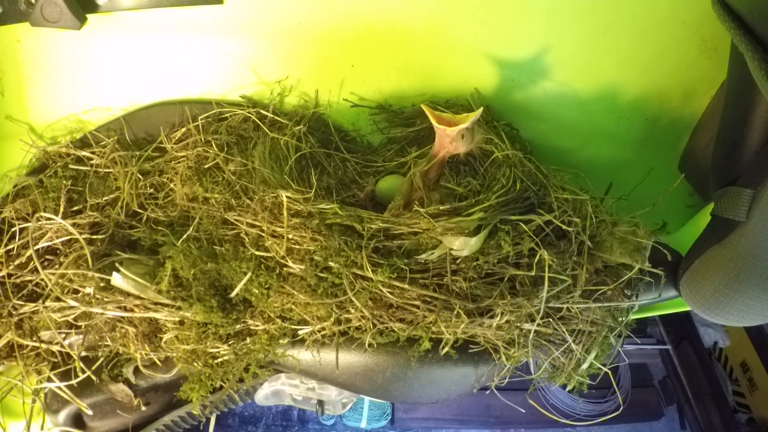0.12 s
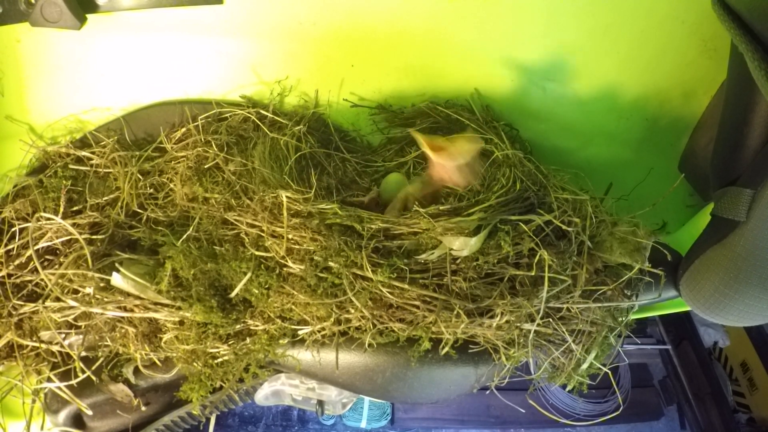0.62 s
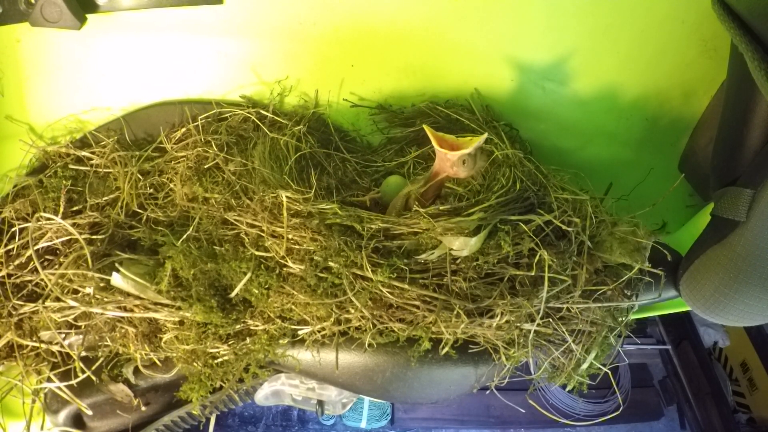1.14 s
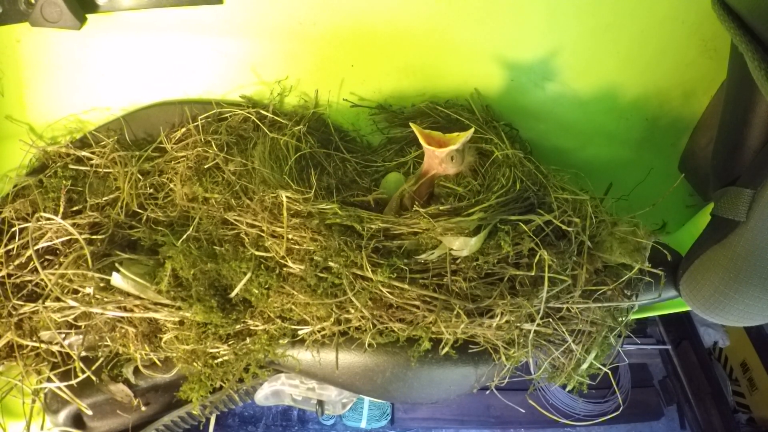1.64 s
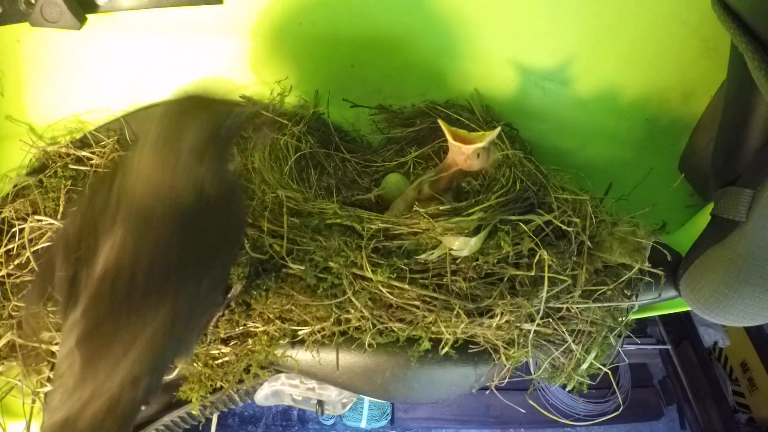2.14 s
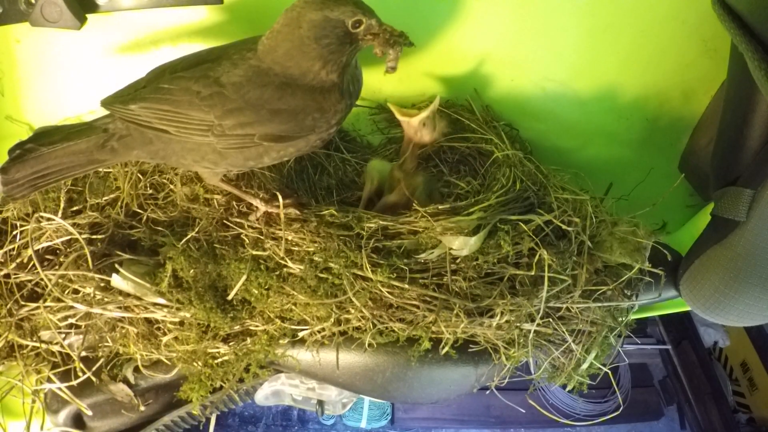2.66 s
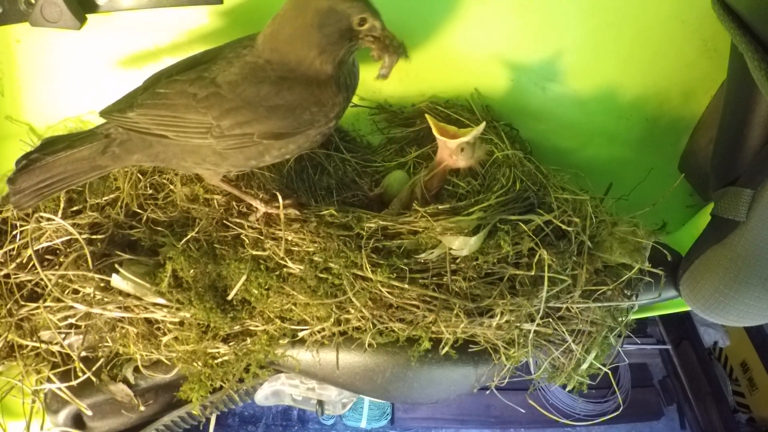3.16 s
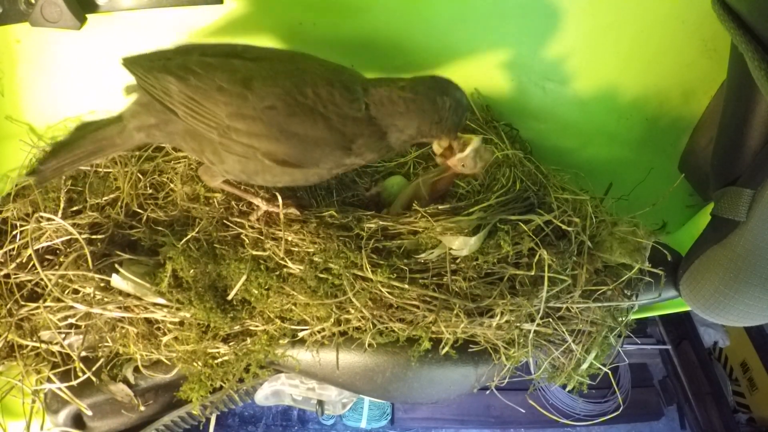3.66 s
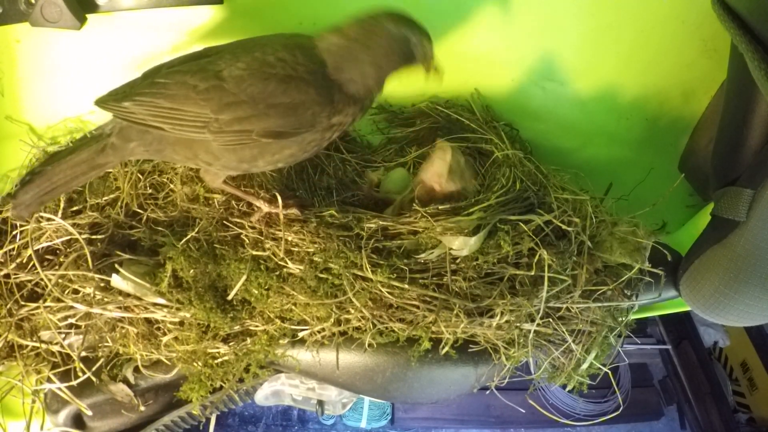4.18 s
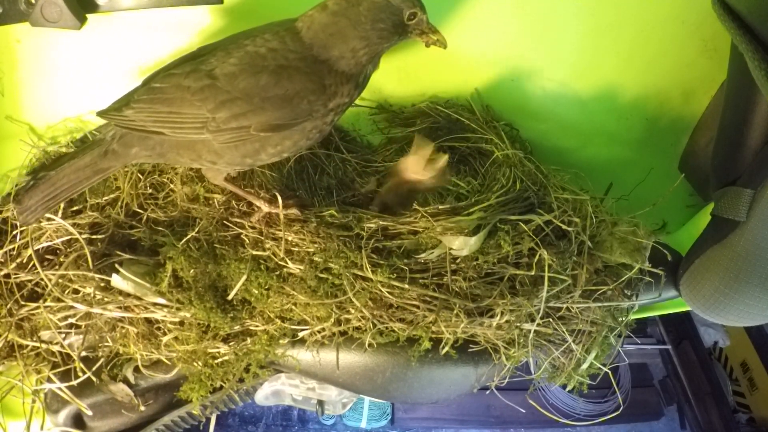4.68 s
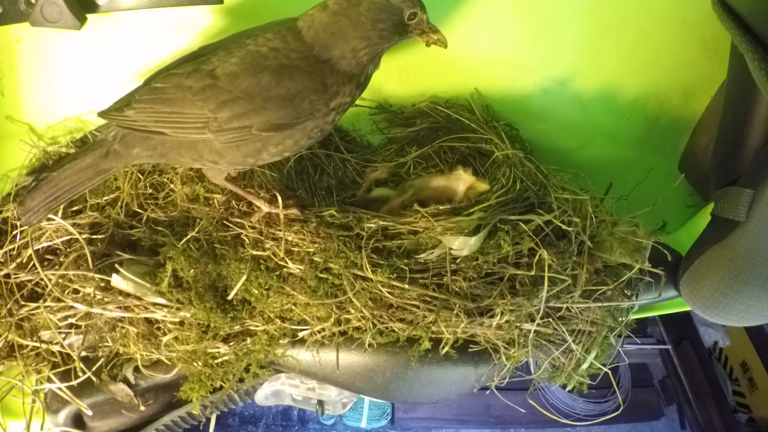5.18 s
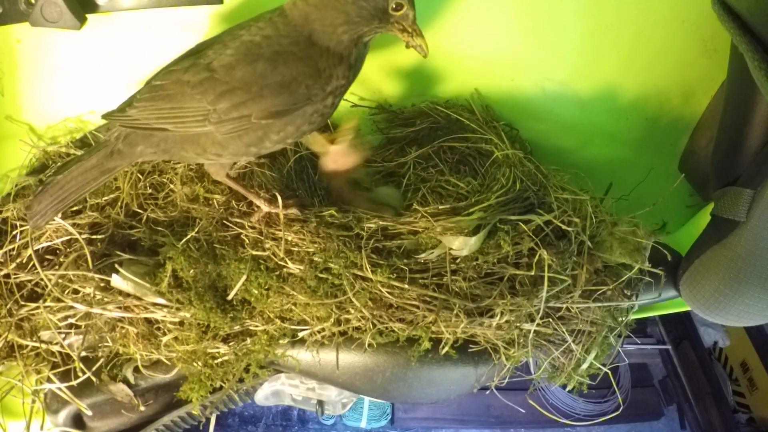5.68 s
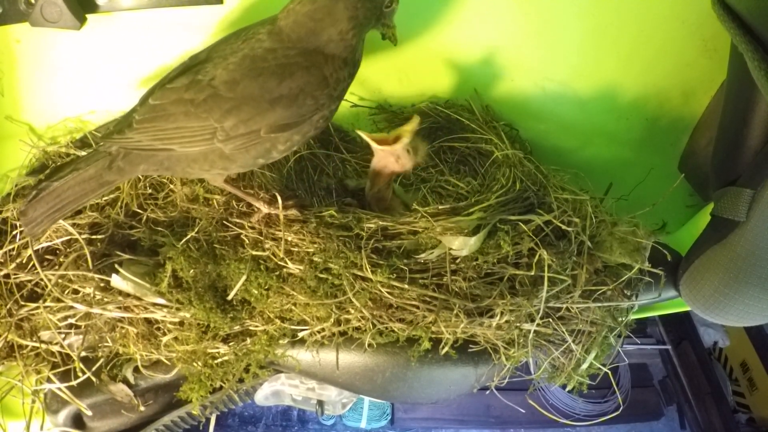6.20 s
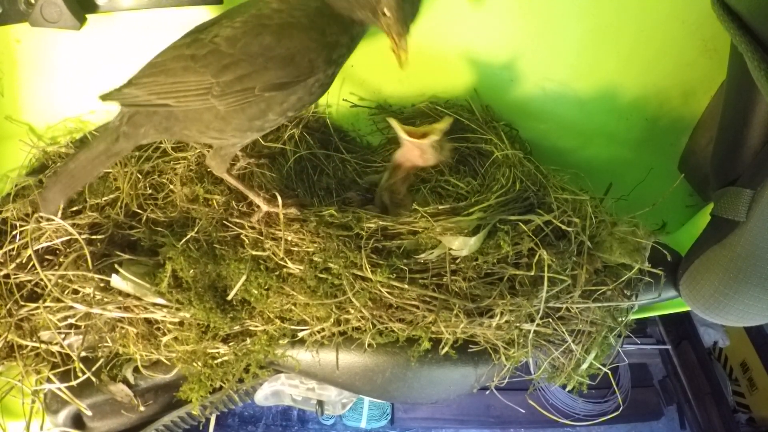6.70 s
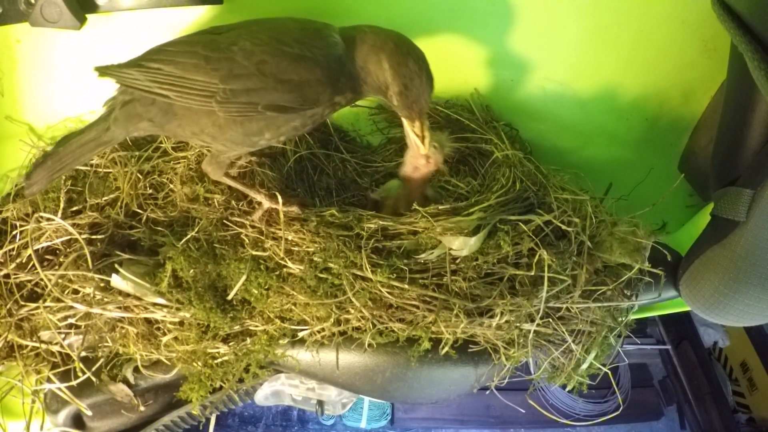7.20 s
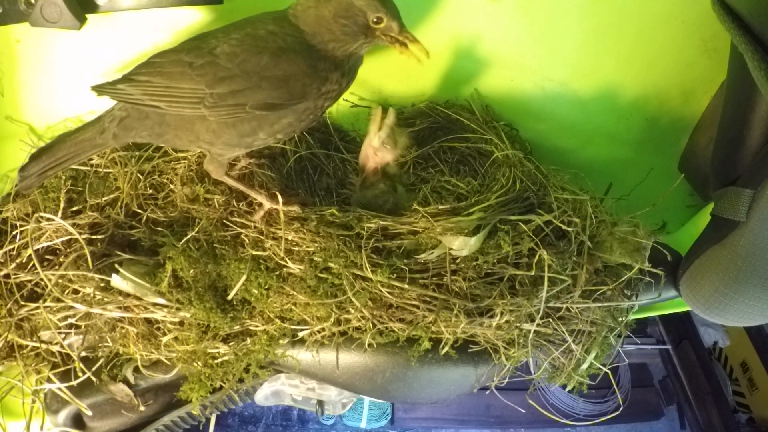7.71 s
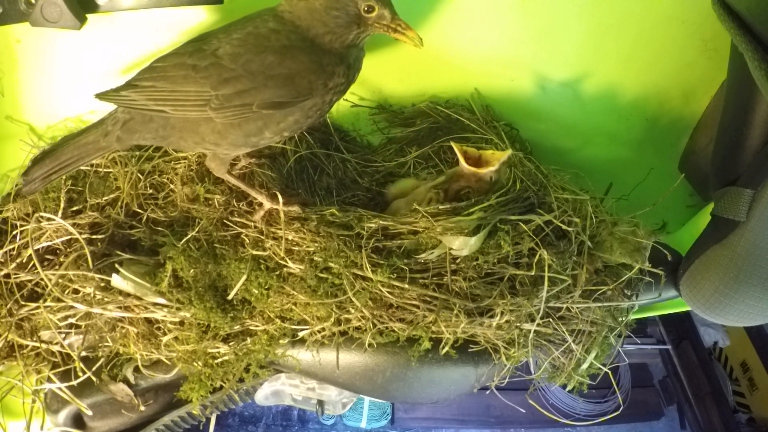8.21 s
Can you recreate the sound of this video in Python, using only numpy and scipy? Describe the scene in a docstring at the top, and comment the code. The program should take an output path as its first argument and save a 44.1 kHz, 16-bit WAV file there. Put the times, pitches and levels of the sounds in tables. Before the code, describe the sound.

A single nestling cheeps about three times a second, very close. Claws scrape and ring a metal rail, wings flutter briefly, and the parent lands with deep, slow thumps and sharp straw crackles. The begging grows louder and harsher, weakens to small peeps while feeding, then bursts out again before the second feed. Soft hiss, low rumble and a faint electrical whine lie behind, in a small enclosed shelter.

```python
"""A nestling cheeps for food, close by: two near-sine voices couple in one throat, and a noisy rasp marks chaos.
The parent's wings throb as feather noise; its claws ring a metal rail as a sum of damped modes.
It lands with slow damped swings of the shelter and rustles the straw in crackling noise bursts.
Behind lie hiss with tiny straw ticks, a ringing hollow, an outside rumble and a thin electrical whine;
dense close reflections surround the nest sounds."""
import sys
import numpy as np
from scipy import signal
from scipy.fft import rfft, irfft
from scipy.io import wavfile
from scipy.ndimage import uniform_filter1d

SR = 44100
rng = np.random.default_rng(int(sys.argv[2]) if len(sys.argv) > 2 else 0)


def volts(x):
    """Linear amplitude factor 10**(x/20) for a level x in dB, scalar or array-like."""
    e = np.asarray(x, float) / 20
    return 10 ** e


def dump_mix(stems):
    """Bounce the given channels to the path in sys.argv[1] as a 16-bit WAV at rate SR."""
    frames = np.atleast_2d(stems).T  # one column per channel
    limited = np.clip(frames, -1, 1)  # hard clip at full scale
    pcm = np.round(limited * 32767).astype(np.int16)
    wavfile.write(sys.argv[1], SR, pcm)


N = 367794  # length in samples

# spectrum of the air hiss: (frequency [Hz], level [dB])
HISS_SPECTRUM = [(76, -50), (130, -4.5), (1060, -14.5), (1170, -13.5), (7600, -16.5), (8740, -22),
                 (14800, -22), (16000, -76)]
# spectrum of the outside rumble: (frequency [Hz], level [dB])
RUMBLE_SPECTRUM = [(8.8, -13), (15, -7.5), (38, -0.5), (86, -1.5), (123, -17.5), (450, -36), (580, -45),
                   (990, -120)]
# air resonances of the shelter: (frequency [Hz], width [Hz], level [dB])
HOLLOW_MODES = [(630, 170, -2), (880, 200, 0)]
# stir of outside noise and moving air, as heard in the hollow: (time [s], level [dB])
STIR_LEVELS = [(0, -71), (.36, -68.5), (.47, -56.5), (.7, -64), (1.0, -71.5), (1.55, -70.5), (2.1, -55),
               (2.75, -56), (3.0, -70), (3.72, -62), (4.55, -58), (5.4, -65), (5.67, -60), (5.9, -64),
               (7.2, -64.5), (7.36, -57.5), (7.6, -65.5), (8.34, -61)]
# the shelter rocks under the landing: (time [s], envelope peak [dB], frequency [Hz], time to envelope peak [s])
THUMP_EVENTS = [(1.924, -31.5, 84.6, 0.027), (1.993, -11, 27.4, 0.035), (2.067, -8.5, 29.4, 0.0244),
                (2.116, -24, 82, 0.019), (2.19, -26, 49.5, 0.013), (2.29, -13, 28.2, 0.027),
                (2.469, -19.5, 94.6, 0.018)]
# spectrum of the feather noise: (frequency [Hz], level [dB])
FEATHER_SPECTRUM = [(600, -8), (1200, 3.5), (4500, -6), (6500, -8.5), (15000, -18)]
# straw crushed or snapped; the first two bursts come from wings fluttering before the landing: (time [s],
# nominal peak [dB], dull part relative to crackle [dB])
RUSTLE_EVENTS = [(1.9315, -60.5, 15), (1.9896, -49, 14), (2.0305, -52.5, 17.5), (2.066, -51.5, 15),
                 (2.0863, -26.5, -0.5), (2.1555, -32, -27), (2.1961, -46.5, -2), (2.2899, -35.5, -30),
                 (2.3067, -27.5, -4.5), (2.346, -40, 8), (2.4577, -45, 5), (3.702, -55.5, 12),
                 (4.1853, -53.5, 10.5), (4.6413, -52, 4), (5.2654, -55.5, 3), (5.3986, -50.5, -15),
                 (5.647, -58, 17.5), (7.3482, -57.5, 22.5), (7.431, -54, 7.5)]
# claws on the rail: (time [s], nominal peak [dB])
CLAW_EVENTS = [(1.5796, -38.5), (1.6791, -26)]
# vibration modes of the rail: (frequency [Hz], level [dB])
RAIL_MODES = [(920, -6.5), (1770, -24), (1990, 2.5), (2900, -3.5), (4340, -3.5), (4830, -6), (5380, -2.5),
              (6410, -6.5), (7750, -15), (8470, -11)]
# faint wheezes: (time [s], level [dB])
WHEEZE_EVENTS = [(0.387, -63), (1.127, -69), (2.769, -66), (3.042, -72), (4.281, -66.5), (5.799, -68),
                 (7.602, -66.5), (7.71, -66)]
# resonances of the narrow throat in a wheeze: (frequency [Hz], width [Hz], level [dB])
WHEEZE_MODES = [(4500, 1300, 0), (6100, 360, -2)]
# overtones and mixed tones: (multiple of left voice [1], multiple of right voice [1])
VOICE_PRODUCTS = [(m, n) for m in range(-1, 5) for n in range(-1, 5) if 1 < abs(m) + abs(n) < 5 and m + n > 0]
# colour that throat and gape give to overtones and rasp: (frequency [Hz], level [dB])
THROAT_COLOUR = [(1200, -8.5), (2000, -8), (4500, -4), (5900, 1), (7800, -1.5), (9400, -9), (10800, -3),
                 (15500, -26)]
# squeaks of one voice alone, mostly as a loud cheep breaks out:
# (start [s], length [s], first pitch [Hz], last pitch [Hz], level [dB])
SQUEAK_EVENTS = [(3.155, 0.014, 6100, 5290, -44.5), (3.443, 0.026, 6100, 5700, -47),
                 (4.464, 0.015, 3600, 4780, -49.5), (5.948, 0.017, 5190, 2920, -48),
                 (6.22, 0.025, 7300, 4760, -46.5), (6.503, 0.029, 7980, 5330, -41),
                 (6.794, 0.013, 6400, 5000, -41), (7.078, 0.021, 5800, 4500, -50)]
# soft peeps that only slide down:
# (start [s], length [s], first pitch [Hz], last pitch [Hz], lower voice [dB], upper voice [dB])
PEEP_EVENTS = [(0.0, 0.058, 2780, 2160, -52, -53), (4.595, 0.032, 4050, 3020, -65, -65),
               (4.656, 0.038, 3910, 2690, -62.5, -62), (4.898, 0.047, 3140, 2660, -65, -70),
               (5.69, 0.03, 2350, 2140, -64, -64), (7.271, 0.039, 3020, 2420, -54, -72),
               (7.548, 0.044, 3040, 2120, -53.5, -69)]
# level offsets shared by full cheeps: (stage [0 opening, 1 dip, 2 crest, 3 close],
# lower voice [dB], upper voice [dB], rasp [dB])
CHEEP_STAGES = [(0, 2, 0, -15.5), (.45, -5.2, 1.5, 2.5), (.95, -2, -6.5, -1.5), (1.4, 0, -0.5, -10),
                (2, -5.5, -2.6, -11), (2.55, -1, -8.5, -22), (3, -5, -28, -30)]
# full begging cheeps; the stage offsets add to the levels: (start [s], length [s],
# dip and crest [shares of length], lower voice at opening, dip, crest and close [Hz],
# upper / lower pitch at dip and crest [1], lower voice [dB], lower voice at opening [dB],
# upper voice [dB], rasp [dB])
BEG_EVENTS = [ (0.313, .082, .34, 0.66, 3030, 2620, 2380, 2100, 1.25, 1.34, -52.5, -47.5, -57, -76),
              (0.624, .099, 0.39, 0.57, 3220, 2764, 2570, 2150, 1.23, 1.3, -49, -51.5, -57.5, -62),
              (0.9, 0.095, 0.31, 0.54, 3350, 2990, 2650, 2160, 1.38, 1.33, -48.5, -65, -53.5, -58.5),
              (1.283, .097, .22, 0.43, 3560, 2960, 2610, 2180, 1.47, 1.3, -50.5, -65, -53, -58),
              (1.627, 0.09, 0.32, 0.65, 3400, 2670, 2500, 2180, 1.4, 1.3, -48, -56, -56.5, -57),
              (2.144, 0.15, .28, 0.77, 3650, 3123, 3020, 2395, 1.31, 1.34, -45, -70, -49, -50),
              (2.385, 0.11, .4, 0.66, 3800, 3075, 3290, 2420, 1.34, 1.3, -47.5, -56, -48.5, -51),
              (2.631, 0.13, 0.28, 0.6, 4200, 3260, 3550, 2460, 1.46, 1.23, -48, -47, -50, -50.5),
              (2.89, 0.1, 0.35, 0.83, 4500, 3050, 3270, 2340, 1.34, 1.22, -46, -55, -53, -49.5),
              (3.157, 0.1, 0.28, 0.7, 3780, 3230, 3205, 2430, 1.33, 1.31, -47.5, -76, -46, -50),
              (3.446, .112, 0.32, 0.68, 3720, 3130, 3180, 2400, 1.39, 1.3, -47.5, -82, -47.5, -50),
              (3.76, 0.094, 0.27, 0.42, 3350, 3440, 3200, 2730, 1.25, 1.27, -52, -62, -54, -60.5),
              (3.95, 0.1, 0.41, 0.85, 3900, 3720, 3820, 2700, 1.23, 1.22, -56, -54.5, -59, -60.5),
              (4.181, 0.065, 0.24, 0.7, 4500, 3800, 3760, 2820, 1.16, 1.15, -56.5, -50, -57, -68),
              (4.405, 0.08, 0.313, 0.68, 3900, 3950, 3450, 2900, 1.16, 1.25, -59, -68, -63, -64),
              (5.96, .118, 0.18, 0.61, 3000, 2776, 3240, 2330, 1.24, 1.3, -46.5, -47.5, -56.5, -46),
              (6.228, .13, 0.37, .63, 3600, 3150, 4190, 2590, 1.27, 1.16, -52.5, -78, -46, -50),
              (6.512, 0.14, 0.31, 0.59, 4000, 3200, 4150, 2560, 1.43, 1.1, -49, -81, -45, -47),
              (6.795, 0.13, 0.35, 0.53, 3750, 3130, 4090, 2670, 1.34, 1.16, -59, -72, -46, -50.5),
              (7.077, 0.073, 0.31, 0.67, 3630, 3480, 3380, 3630, 1.17, 1.14, -56, -69, -48, -53.5),
              (7.844, .098, 0.46, 0.53, 4300, 3067, 2946, 2860, 0.97, 0.99, -53, -44.5, -48.5, -68),
              (8.173, 0.056, 0.47, 0.93, 4180, 3490, 4240, 4130, 1.15, 1.17, -49, -44, -45.5, -51.5), ]


def evened(x):
    """Normalization: scales a signal to unit rms."""
    return x / np.sqrt(np.mean(x ** 2) + 1e-20)


def add(mix, s, sound):
    """Superposition: adds a sound to the mix from second s on."""
    part = mix[round(s * SR):][:len(sound)]
    part += sound[:len(part)]


def read(points, hz):
    """Spectral envelope: interpolates dB over log frequency and returns the gain at hz."""
    f, db = np.transpose(points)
    return volts(np.interp(np.log(hz + 1), np.log(f + 1), db))


def resonate(x, hz, width):
    """Heterodyne resonance: shifts the curve hz down to zero, smooths, and shifts back."""
    turn = np.exp(2j * np.pi * np.cumsum(hz * np.ones(len(x))) / SR)
    r = np.exp(-np.pi * width / SR)
    return 2 * (turn * signal.lfilter([1 - r], [1, -r], x / turn)).real


def through(modes, x):
    """Modal superposition: sums steep resonances; alternate signs keep the valleys shallow."""
    total = 0
    for k, (hz, width, db) in enumerate(modes):
        steep = resonate(resonate(x, hz, width), hz, width)
        total = total + (-1) ** k * volts(db) * steep
    return evened(total)


def coloured(points, n):
    """Spectral shaping: steady noise of unit rms with a given spectrum."""
    spectrum = rfft(rng.standard_normal(n)) * read(points, np.fft.rfftfreq(n, 1 / SR))
    return evened(irfft(spectrum, n))


def ticking_hiss():
    """Shot noise on steady noise: sparse decaying pulses raise the hiss as tiny straw ticks."""
    pulses = (rng.random(N) < 25 / SR) * rng.exponential(.6, N)  # 25 per second on average
    ticks = signal.lfilter([1], [1, -np.exp(-1 / 80)], pulses)
    return volts(-64) * (1 + 1.3 * ticks) * coloured(HISS_SPECTRUM, N)


def ringing_hollow(stir_db):
    """Cavity resonance: stirred air excites the shelter's modes with uneven strength."""
    gusts = evened(uniform_filter1d(uniform_filter1d(rng.standard_normal(N), 1500), 1500))
    return through(HOLLOW_MODES, rng.standard_normal(N)) * volts(stir_db + 3 * gusts)


def outside_rumble(stir_db):
    """Low-frequency noise: its level follows 0.59 of the stir, in dB."""
    return coloured(RUMBLE_SPECTRUM, N) * volts(-44.5 + 0.59 * (stir_db + 62.5))


def electrical_whine():
    """Narrowband filtering: noise through one sharp resonance gives a thin whine."""
    return volts(-74.5) * through([(8580, 160, 0)], rng.standard_normal(N))


def background():
    """Superposition of independent sources: hiss, hollow, rumble and whine."""
    stir_db = np.interp(np.arange(N) / SR, *np.transpose(STIR_LEVELS))
    return ticking_hiss() + ringing_hollow(stir_db) + outside_rumble(stir_db) + electrical_whine()


def walls(x):
    """Reverberation: convolution with dense close reflections that fall 60 dB in 0.093 s."""
    t = np.arange(SR // 8) / SR
    signs = rng.choice([-1., 1.], len(t))
    present = (rng.random(len(t)) < .05) * (t > .002)
    taps = signs * present * volts(-60 * t / 0.093)
    return signal.oaconvolve(x, taps / np.linalg.norm(taps))[:N]


def thump(s, db, hz, top):
    """Transient oscillation: a slow swing dips first, swells and dies."""
    t = np.arange(SR // 4) / SR
    u = t / top
    envelope = (u * np.exp(1 - u)) ** 2
    return s, -volts(db) * envelope * np.sin(2 * np.pi * hz * t)


def wings():
    """Amplitude modulation: feather noise throbs with the wing beats before the landing."""
    start_s, length_s, beats_per_s = 1.86, 0.15, 18
    t = np.arange(round(length_s * SR)) / SR
    beats = 1 - .5 * np.cos(2 * np.pi * beats_per_s * t)
    beats *= volts(3 * evened(uniform_filter1d(rng.standard_normal(len(t)), 200)))  # uneven gusts
    swell = np.sin(np.pi * t / length_s)
    return start_s, volts(-54) * coloured(FEATHER_SPECTRUM, len(t)) * beats * swell


def rustle(s, db, dull_db):
    """Impulsive noise: straw crackles with a duller push into the hollow, then a short tail."""
    t = np.arange(SR // 5) / SR
    bright_noise, dull_noise, grain = rng.standard_normal((3, len(t)))
    grain_db = 3.7 * evened(uniform_filter1d(grain, 60))
    crackle = evened(resonate(bright_noise, 8100, 22000)) * volts(grain_db)
    dull = volts(dull_db) * through([(730, 530, 1.2), (165, 85, 10.4)], dull_noise)
    shape = np.minimum(t / .004, 1) * volts(-60 * np.maximum(t - .012, 0) / .055)
    return s, volts(db - 6.0) * (crackle + dull) * shape


def claw(s, db):
    """Modal excitation: a short scratch rings the rail, which the gripping foot soon damps."""
    t = np.arange(SR // 4) / SR
    scratch = rng.standard_normal(len(t)) * volts(-60 * t / 0.12) * np.minimum(t / 0.00046, 1)
    modes = np.zeros(len(t))
    for hz, level in RAIL_MODES:
        decay = volts(level - 60 * t * np.sqrt(hz / 2000) / 0.039)  # high modes die sooner
        modes += decay * np.sin(2 * np.pi * hz * t)
    ring = signal.fftconvolve(scratch, modes)[:len(t)]
    thin = signal.butter(2, 600, "high", fs=SR)  # the claw sound carries no bass below about 600 Hz
    return s, volts(db) * signal.lfilter(*thin, ring / abs(ring).max() + 0.45 * scratch)


def wheeze(s, db):
    """Turbulent flow: air drawn through a narrow throat excites its resonances."""
    n = round(.13 * SR)
    return s, volts(db) * through(WHEEZE_MODES, rng.standard_normal(n)) * signal.windows.tukey(n, .4)


def voice_tones(left, right, left_hz, right_hz, left_db, right_db):
    """Nonlinear mixing: two sines gain overtones and sum or difference tones, coloured by the throat."""
    tone = volts(left_db) * np.sin(left) + volts(right_db) * np.sin(right)
    for m, n in VOICE_PRODUCTS:
        order, hz = abs(m) + abs(n), m * left_hz + n * right_hz
        db = (abs(m) * left_db + abs(n) * right_db) / order
        # loud notes are brighter; mixed tones are weaker than pure overtones
        db += (.2 * (db + 50) - 4.5) * (order - 1) - 5 - 10 * (m * n != 0)
        tone += (hz < SR / 2) * read(THROAT_COLOUR, hz) * volts(db) * np.sin(m * left + n * right)
    return tone


def rasp_noise(left_hz, right_hz):
    """Narrowband noise: rasp hugs the voice lines over a broad throat hiss."""
    hiss = coloured(THROAT_COLOUR, len(left_hz))
    clumps = sum(resonate(hiss, k * hz, 470) for hz in (left_hz, right_hz) for k in (1, 2))
    clumps += .5 * resonate(hiss, left_hz * 2 / 3, 700)  # a broken cycle sounds below the voices
    return evened(.45 * hiss + clumps)


def cheep(rows):
    """Coupled oscillators: two near-sine voices mix in one throat, and chaos smears every line."""
    s, *columns = np.transpose(rows)
    t = np.arange(s[0], s[-1], 1 / SR)
    left_hz, left_db, right_hz, right_db, rasp_db = (
        uniform_filter1d(np.interp(t, s, c), 150) for c in columns)
    wobble, flutter = (evened(uniform_filter1d(v, 90)) for v in rng.standard_normal((2, 2, len(t))))
    waver = .01 * evened(uniform_filter1d(uniform_filter1d(wobble, 400), 400))  # slow kinks in the pitch
    chaos = np.clip(volts(rasp_db - np.maximum(left_db, right_db)), 0, 1) ** 2
    pitches = [left_hz, right_hz] * (1 + waver + (0.0037 + 0.067 * chaos) * wobble)
    left, right = 2 * np.pi * np.cumsum(pitches, axis=1) / SR
    falter = evened(uniform_filter1d(uniform_filter1d(flutter, 350), 350))  # slow level changes
    left_db, right_db = [left_db, right_db] + (1.7 + 0.44 * chaos) * flutter + 2.5 * falter
    tone = voice_tones(left, right, left_hz, right_hz, left_db, right_db)
    rasp = rasp_noise(left_hz, right_hz) * volts(rasp_db + 4 * flutter[0])
    edges = np.clip(np.minimum(t - t[0], t[-1] - t) / .005, 0, 1)
    return s[0], (np.sqrt(2) * tone + rasp) * edges


def squeak(s, length, from_hz, to_hz, db):
    """Frequency modulation: one voice alone bends ever faster."""
    u = np.linspace(0, 1, num=20)
    hz = from_hz + (to_hz - from_hz) * u ** 1.1
    mute = -120 + 0 * u  # silences the second voice and the rasp [dB]
    return cheep(np.transpose([s + u * length, hz, db - 0.5 * u, hz, mute, mute]))


def peep(s, length, from_hz, to_hz, lower_db, upper_db):
    """Parallel glide: both voices slide down at a fixed interval, fast at first, and fade."""
    u = np.linspace(0, 1, num=20)
    hz = to_hz + (from_hz - to_hz) * (1 - u) ** 1.4
    fade = -7.5 * u ** 2
    return cheep(np.transpose([s + u * length, hz, lower_db + fade, 1.28 * hz, upper_db + fade,
                               lower_db + fade - 17.5]))


def beg(s, length, dip, crest, open_hz, dip_hz, crest_hz, close_hz, dip_interval, crest_interval,
        lower_db, open_db, upper_db, rasp_db):
    """Two-voice glide: pitch moves through a rasping dip to a crest and on to its close."""
    u = np.linspace(0, 1, num=40)
    stretches = ((0, dip), (dip, crest), (crest, 1))
    drop, climb, fall = (np.clip((u - a) / (b - a), 0, 1) for a, b in stretches)
    late_climb = climb ** 1.5
    rise_hz = (crest_hz - dip_hz) * late_climb
    drop_hz = (dip_hz - open_hz) * np.sin(np.pi / 2 * drop) ** 1.4
    hz = open_hz + drop_hz + rise_hz + (close_hz - crest_hz) * fall ** 1.4
    interval = dip_interval + (crest_interval - dip_interval) * late_climb
    # the voices open no further apart than a ratio of 1.27
    upper_hz = hz * (interval - max(dip_interval - 1.27, 0) * (1 - drop))
    stage, *stage_db = np.transpose(CHEEP_STAGES)
    lower, upper, rasp = (np.interp(drop + climb + fall, stage, db) for db in stage_db)
    lower += lower_db + (open_db - lower_db) * (1 - drop ** 2)
    rasp += rasp_db + .006 * np.maximum(rise_hz, 0)  # a wide climb strains the voice [dB per Hz]
    return cheep(np.transpose([s + u * length, hz, lower, upper_hz, upper_db + upper, rasp]))


def scene():
    """Superposition: nest sounds with their reflections, over thumps and background."""
    nest, low = np.zeros(N), np.zeros(N)
    sources = ((rustle, RUSTLE_EVENTS), (claw, CLAW_EVENTS), (wheeze, WHEEZE_EVENTS),
               (squeak, SQUEAK_EVENTS), (peep, PEEP_EVENTS), (beg, BEG_EVENTS))
    for source, events in sources:
        for row in events:
            add(nest, *source(*row))
    add(nest, *wings())
    for row in THUMP_EVENTS:
        add(low, *thump(*row))
    return (nest + volts(-11) * walls(nest) + low + background())[None]


def top_cut(x):
    """Nothing passes above the cut-off."""
    return signal.sosfilt(signal.butter(12, 16450, fs=SR, output="sos"), x)


def record(dry):
    """Band limitation: a linear-phase low-pass at 15.8 kHz finishes the mix."""
    band = signal.firwin(255, 15800, window=("kaiser", 9), fs=SR)
    mix = signal.oaconvolve(dry, band[None], "same")
    return top_cut(mix)


dry = scene()
out = record(dry)
dump_mix(out)
```